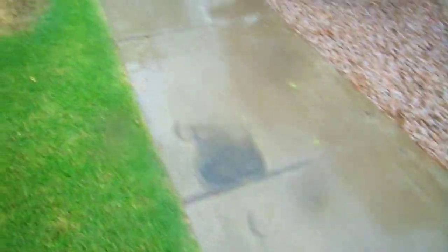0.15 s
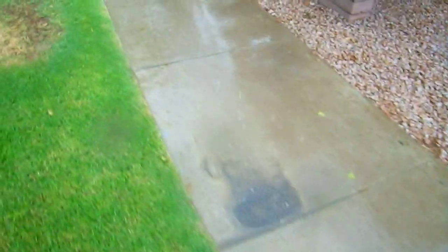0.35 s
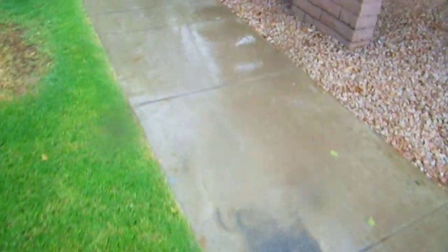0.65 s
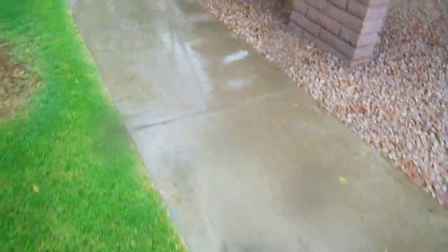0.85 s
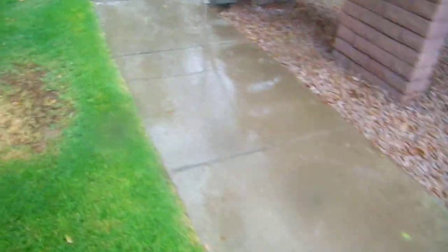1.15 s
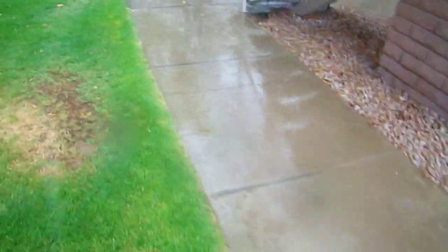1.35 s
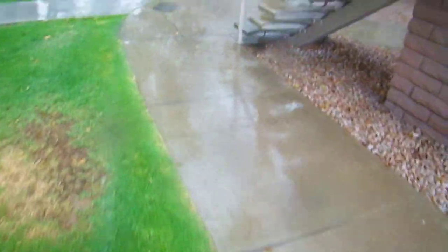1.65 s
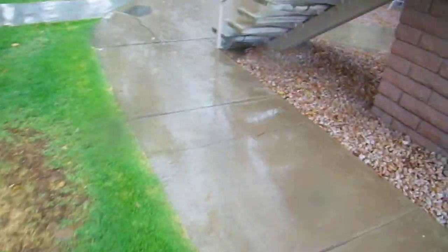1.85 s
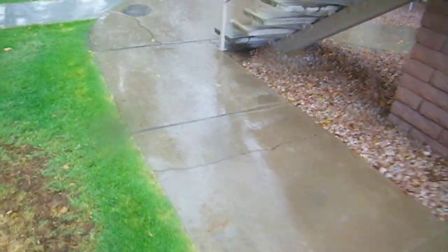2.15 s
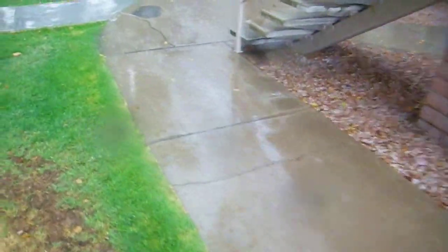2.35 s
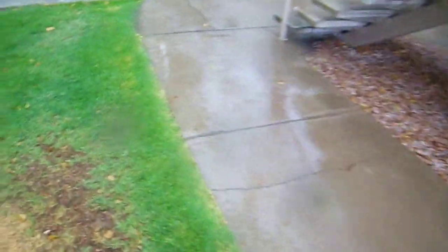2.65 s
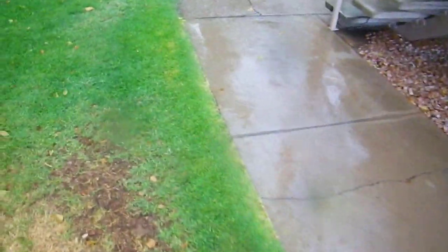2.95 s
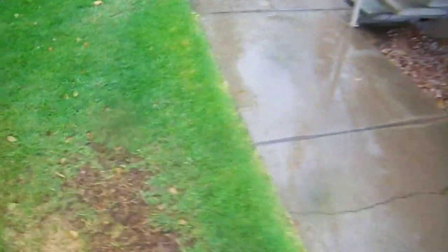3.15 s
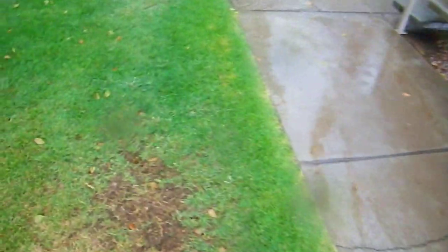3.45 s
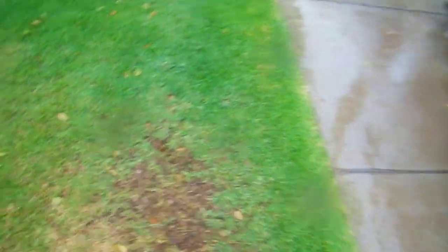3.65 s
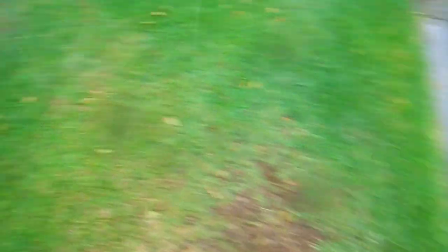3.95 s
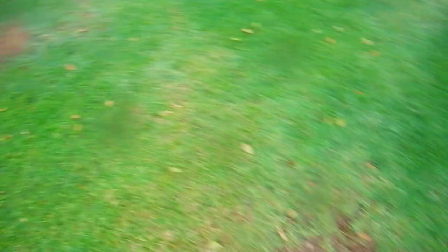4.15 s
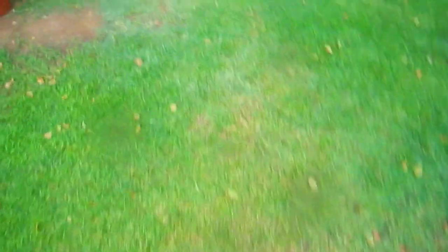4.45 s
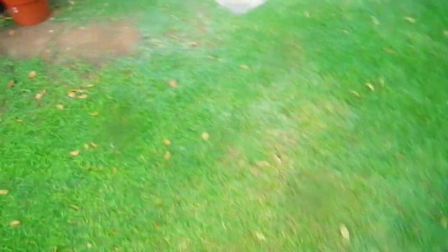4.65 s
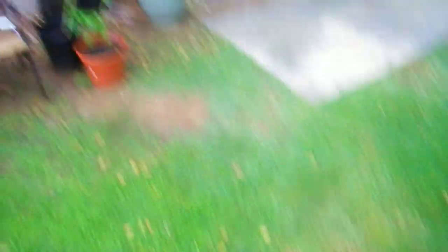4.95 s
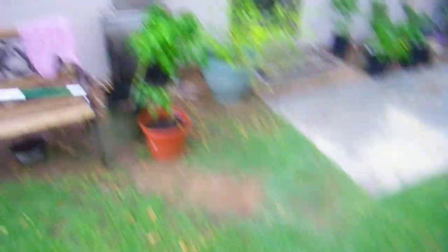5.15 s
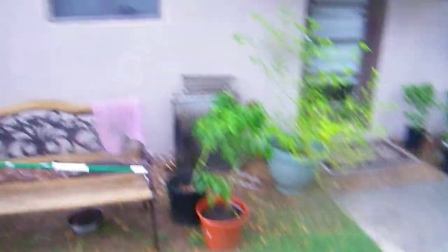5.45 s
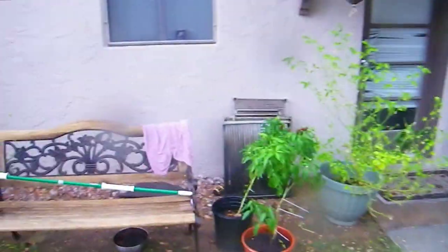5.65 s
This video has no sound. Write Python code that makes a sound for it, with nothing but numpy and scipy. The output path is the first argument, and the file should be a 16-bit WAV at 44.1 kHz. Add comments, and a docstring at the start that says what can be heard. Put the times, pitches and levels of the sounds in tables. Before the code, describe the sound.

Outdoor downpour with an even rush of far drops and a grainy patter of close ones. It rises until the first hard hit. Single bright ticks and short woody taps on the camera case stand out, clustering between two and three and a half seconds. The loudest overload the cheap microphone, and its automatic level ducks the rain and slowly recovers.

```python
"""Heavy rain around a handheld camera

Heavy rain on a lawn, a concrete path and gravel, heard through a small handheld camera.
Far drops are a wash of coloured noise; nearer ones are clicks with puffs of spray, the closest single ticks.
Drops striking the camera body ring damped modes of its hollow, shell and case, with a crack of noise.
The hard strikes duck the gain control and overload the microphone: the rain drops away and swells back."""
import sys
import numpy as np
from scipy import signal
from scipy.fft import rfft, irfft, next_fast_len
from scipy.io import wavfile
from scipy.ndimage import uniform_filter1d, map_coordinates

SR = 44100
rng = np.random.default_rng(int(sys.argv[2]) if len(sys.argv) > 2 else 0)


def wav_record(signal):
    """Record a signal, one row per channel, as 16-bit PCM in the file named by sys.argv[1]."""
    frames = np.transpose(np.atleast_2d(signal))
    bounded = np.clip(frames, -1, 1)
    # unit amplitude maps onto the largest positive 16-bit level
    quanta = np.round(bounded * 32767).astype(np.int16)
    wavfile.write(sys.argv[1], SR, quanta)


N = 255780
TIME = np.arange(N) / SR

# spectrum of a big drop's tick, before the microphone: pitch_hz, relative density_db (per Hz)
TICK_SPECTRUM = [(200, -27), (1000, -31), (2000, -5.5), (3200, 2), (5500, 1), (8500, -5.5), (11500, -24),
                 (16000, -35)]


def amp(db):
    """Decibels to gain."""
    return 10 ** (np.asarray(db) / 20)


def unit(x):
    """Scale to rms 1."""
    return x / np.sqrt(np.mean(x ** 2) + 1e-20)


def along(points, hz):
    """Read a curve of (Hz, value) points on a log frequency axis."""
    f, value = np.transpose(points)
    return np.interp(np.log(hz + 1), np.log(f), value)


def wobble(rate):
    """A smooth random curve through `rate` knots a second."""
    return map_coordinates(rng.standard_normal(256), [TIME * rate], mode="mirror")


def short_rms(x):
    """Running rms over a millisecond and a half."""
    power = uniform_filter1d(x ** 2, 66, mode="constant")
    return np.sqrt(np.abs(power) + 1e-12)


def add(track, start_s, sound, level_db):
    """Mix in a short sound whose loudest moment has the given level."""
    start = int(round(start_s * SR))
    part = track[start:start + len(sound)]
    levelled = amp(level_db) * sound / short_rms(sound).max()
    part += levelled[:len(part)]


def through_microphone(x, spectrum, size=4096):
    """Colour a source causally: its spectrum times the response of the microphone port and the camera."""
    # peaks and dips of the microphone port and the camera's filtering,
    # with a deep narrow notch near 7.8 kHz: pitch_hz, width_hz, gain_db
    peaks_and_dips = [(1318, 676, 13), (3500, 540, 6), (3770, 320, -7.5), (4630, 860, 8),
                      (7755, 207, -24.5)]
    hz = np.fft.rfftfreq(size, 1 / SR)
    response_db = sum(gain_db / (1 + (2 * (hz - f) / width) ** 2) for f, width, gain_db in peaks_and_dips)
    # folding the cepstrum forward gives a minimum-phase filter
    cepstrum = irfft(np.log(amp(along(spectrum, hz) + response_db)))
    cepstrum[1:size // 2] *= 2
    cepstrum[size // 2 + 1:] = 0
    impulse = irfft(np.exp(rfft(cepstrum)))
    return signal.fftconvolve(x, impulse)[:len(x)]


def low_notes(width_s):
    """Two soft hollow notes nearly buried in the rain: sines under bell-shaped swells."""
    # the notes: centre_s, pitch_hz, level_db
    hollow_notes = [(.846, 286, -32), (.888, 262, -38)]
    out = np.zeros(N)
    for centre_s, hz, level_db in hollow_notes:
        swell = np.exp(-((TIME - centre_s) / width_s) ** 2)
        out += amp(level_db) * swell * np.sin(2 * np.pi * hz * TIME)
    return out


def wash(level_db, flutter_db):
    """Countless far drops merge into an even rush: coloured noise with a slight flutter in level."""
    # spectrum of the far rain before the microphone: pitch_hz, relative density_db (per Hz)
    wash_spectrum = [(20, -19), (60, -9.5), (110, -7.5), (190, -11), (300, -9.5), (480, -14), (730, -14),
                     (900, -20), (1800, -12.5), (3000, -5), (5000, -6), (8500, -13), (11500, -25),
                     (16000, -39)]
    level = amp(level_db + flutter_db * wobble(14))
    rush = through_microphone(rng.standard_normal(N), wash_spectrum)
    return level * unit(rush)


def patter(level_db, spray_db, count):
    """Drops within a few metres, many small and few large: each a click followed by a puff of spray."""
    # fine spray and the ticks of single drops, before the microphone: pitch_hz, relative density_db (per Hz)
    spray_spectrum = [(200, -36), (1000, -28), (2000, -6), (3200, 3), (5500, 2), (8500, -7), (10200, -10),
                      (11500, -19.5), (16000, -21)]
    when, rarity = rng.random((count, 2)).T
    # sizes follow a power law with an upper limit
    strength = (rarity + .022) ** -.45
    at = (when * N).astype(int)
    clicks = np.bincount(at, strength * rng.choice([-1, 1], count), N)
    puff = amp(-60 * np.arange(SR // 20) / SR / .012)  # falls 60 dB in 12 ms
    # overlapping puffs add in power
    spray_power = signal.fftconvolve(np.bincount(at, strength ** 2, N), puff ** 2)[:N]
    spray = np.sqrt(np.abs(spray_power)) * rng.standard_normal(N)
    drops = unit(clicks) + amp(spray_db) * unit(spray)
    return amp(level_db) * unit(through_microphone(drops, spray_spectrum))


def burst(t, spray_db, spray_t60, crack_t60):
    """Envelope of one drop: a sharp impact, then its spray falling back; t60s in seconds."""
    impact = amp(-60 * t / crack_t60)
    spray = amp(spray_db - 60 * t / spray_t60)
    return impact + spray


def scattered(level_db, spread_db, count):
    """Drops at chance moments all through the shower: rows of (start_s, level_db)."""
    when, size = rng.random((count, 2)).T
    start_s = (np.arange(count) + when) / count * TIME[-1]  # one drop in each equal stretch
    return np.column_stack([start_s, level_db + spread_db * (2 * size - 1)])


def splashes(level_db):
    """The nearest drops burst on the ground as single bright ticks of decaying noise."""
    # the biggest drops close by: start_s, level_db (relative to level_db of this layer)
    big_drops = [(.802, -10.5), (.8646, -9.5), (1.159, -11.5), (1.211, -7.5), (1.7915, -11), (2.5707, -9.5),
                 (3.3203, -6.5), (3.4918, -6.5), (3.638, -0.5), (4.019, -12.5), (4.3086, -12)]
    out, t = np.zeros(N), np.arange(SR // 20) / SR
    shape = burst(t, spray_db=-11, spray_t60=.024, crack_t60=.003)
    # smaller ones fall at random around them
    small_drops = scattered(level_db=-15, spread_db=6.5, count=18)
    for start_s, drop_db in [*big_drops, *small_drops]:
        tick = through_microphone(shape * rng.standard_normal(len(t)), TICK_SPECTRUM)
        add(out, start_s, tick, drop_db + level_db)
    return out


def ringing(modes, hz, t, attack_s):
    """Damped modes at multiples of hz, neighbours swinging opposite ways, building up as the drop flattens."""
    waves = np.zeros(len(t))
    for i, (multiple, db, t60) in enumerate(modes):
        decay = amp(db - 60 * t / t60)
        waves += (-1) ** i * decay * np.cos(2 * np.pi * multiple * hz * t)
    return waves * (1 - np.exp(-t / attack_s))


def taps(crack_db, tail_db, wet_s, damped_db):
    """A drop on the camera knocks its hollow, pings its shell and thuds its case, mixed by where it lands."""
    # heavy drops on the body: start_s, level_db, knock_hz (hollow), ring_hz (shell),
    # ring_db (ring and crack, gain against the knock), thud_db (case, gain against the knock)
    strikes = [(.377, -3, 1320, 4800, 32, -17), (.703, -.5, 1370, 3530, 14, -20),
               (1.0058, -10.5, 1140, 4440, -20, -18), (1.039, -1.5, 1303, 5000, -5, -20),
               (1.277, 4.5, 1305, 3340, 1.5, -38), (1.3837, 4.5, 1360, 3350, -6, -31),
               (1.6062, -6.5, 1194, 4600, -3.5, -16.5), (2.0237, -14, 1310, 4330, -11, -24),
               (2.156, -8, 1430, 4750, -5.5, -11), (2.2363, 21, 1370, 3306, -3, -18),
               (2.9752, 7.5, 1260, 3510, 9.5, -13.5), (3.0555, 14, 1402, 4900, -10, -8),
               (3.1848, 17, 1203, 3330, -12, -10.5), (3.331, 3, 1175, 3420, -25, -12.5),
               (3.476, -10, 1295, 4640, -3, -14), (3.5057, -8, 1200, 4600, -12, -13),
               (4.3971, -.5, 1020, 3430, 14.5, -10.5), (4.805, 14.5, 1237, 3560, -9.5, -13.5),
               (5.7316, -7, 1247, 3540, -14, -10.5)]
    # modes of the hollow: multiple of knock_hz, relative level_db, t60_s before the wet damping
    knock_modes = [(.86, -6, 0.0086), (1, 4.5, 0.016), (1.6, -14.5, 0.0093)]
    # modes of the shell: multiple of ring_hz, relative level_db, t60_s
    ring_modes = [(.68, 2, 0.0058), (1, 6.5, .012), (1.35, -4, 0.0033)]
    # slower modes of the whole case: pitch_hz (before the tuning factor below), relative level_db, t60_s
    case_modes = [(107, -9.5, 0.011), (336, -1.5, 0.029), (476, 0, 0.015), (825, 11.5, .014)]
    case_tuning = 0.899
    out, t = np.zeros(N), np.arange(SR // 16) / SR
    # spreading water chokes the knock after a few cycles
    damping = 1 / (1 + (t / wet_s) ** 8) + amp(damped_db)
    for start_s, level_db, knock_hz, ring_hz, ring_db, thud_db in strikes:
        knock = ringing(knock_modes, knock_hz, t, attack_s=0.00073) * damping
        thud = ringing(case_modes, case_tuning, t, attack_s=0.00074)
        hiss = unit(through_microphone(rng.standard_normal(len(t)), TICK_SPECTRUM))
        crack = amp(crack_db) * burst(t, spray_db=tail_db, spray_t60=0.013, crack_t60=0.0019) * hiss
        ring = ringing(ring_modes, ring_hz, t, attack_s=.0001) + crack
        strike = knock - amp(ring_db) * ring + amp(thud_db) * thud
        add(out, start_s, strike, level_db)
    return out


def scene():
    """Far and near rain swell once and ease off together; single drops and low notes sit on top."""
    peak_s, peak_db, rise_db_per_s, ease_db_per_s = 1.68, 2.5, 2.5, 1.0
    below_peak_db = np.maximum(rise_db_per_s * (peak_s - TIME), ease_db_per_s * (TIME - peak_s))
    shower_db = peak_db - below_peak_db
    rain = wash(level_db=-23.0, flutter_db=0.6) + patter(level_db=-25.0, spray_db=1, count=2600)
    drops = splashes(level_db=1.5) + taps(crack_db=3.5, tail_db=-16.5, wet_s=0.0055, damped_db=-12.0)
    return (amp(shower_db) * rain + drops + low_notes(width_s=0.017))[None]


def gain_control(x, limit_db, recovery_db_per_s, attack_s):
    """The gain dives within milliseconds when the sound passes the limit, then creeps back up."""
    climb_db = recovery_db_per_s * TIME
    allowed_db = limit_db - 20 * np.log10(short_rms(x))
    # the lowest gain demanded so far, each demand relaxing at the recovery rate
    target_db = np.minimum(np.minimum.accumulate(allowed_db - climb_db), 0) + climb_db
    keep = np.exp(-1 / (attack_s * SR))
    return x * amp(signal.lfilter([1 - keep], [1, -keep], target_db))


def record(dry):
    """The camera's gain control, microphone overload as a soft ceiling, and its band limits."""
    ceiling, low_cut_hz, top_hz = .73, 30, 15900
    x = gain_control(dry[0], limit_db=-8.5, recovery_db_per_s=12.5, attack_s=0.00096)
    x = x / (1 + np.abs(x / ceiling) ** 8) ** (1 / 8)
    x = signal.sosfilt(signal.butter(2, low_cut_hz, "highpass", fs=SR, output="sos"), x)
    # a sheer cut above top_hz
    size = next_fast_len(N + SR // 2)
    passed = np.fft.rfftfreq(size, 1 / SR) < top_hz
    return irfft(rfft(x, size) * passed, size)[None, :N]


dry = scene()
out = record(dry)
wav_record(out)
```